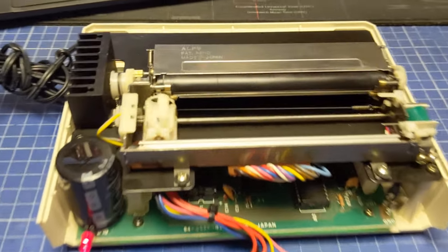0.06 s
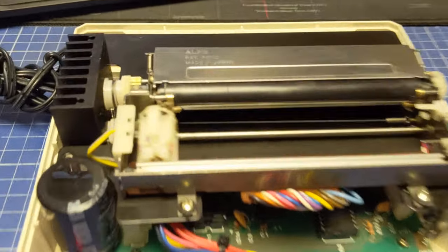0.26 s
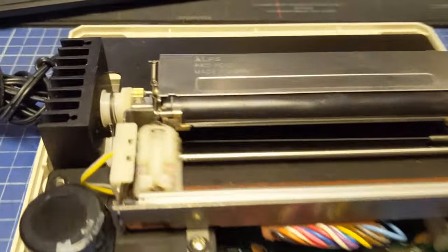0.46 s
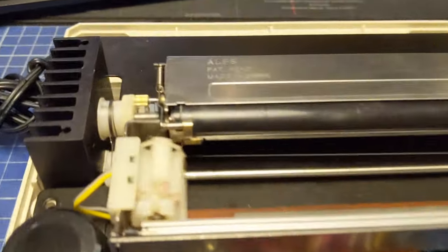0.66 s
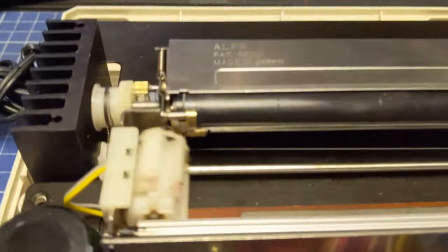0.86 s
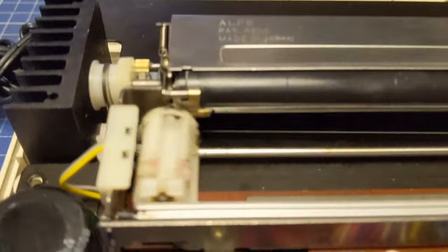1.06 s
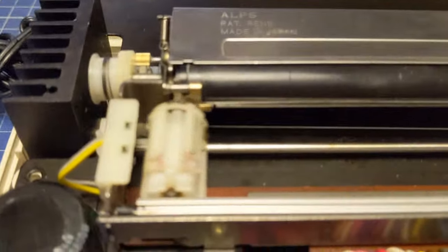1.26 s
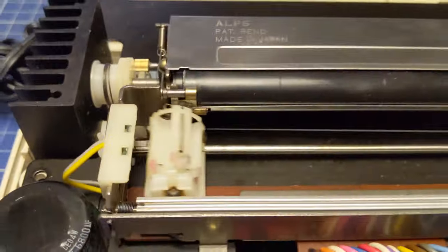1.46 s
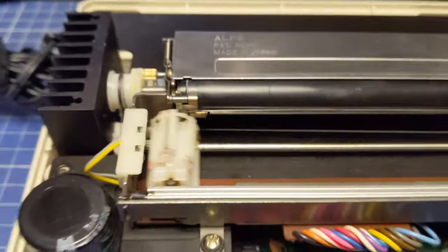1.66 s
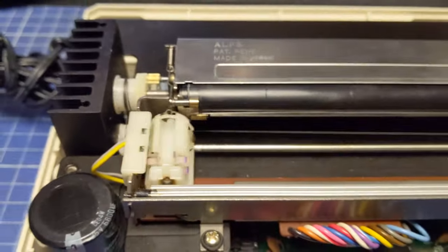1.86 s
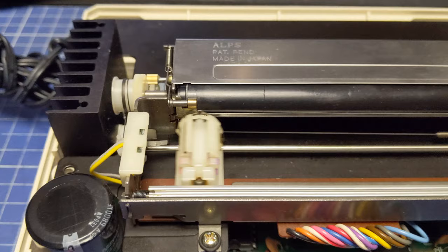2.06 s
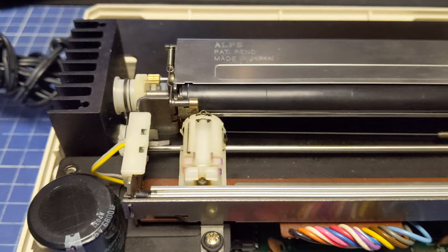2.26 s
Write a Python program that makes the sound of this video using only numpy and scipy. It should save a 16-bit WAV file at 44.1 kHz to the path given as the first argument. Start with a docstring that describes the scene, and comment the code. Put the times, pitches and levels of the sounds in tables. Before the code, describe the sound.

A small pen plotter clicks close by from the start, repeating a pattern of sharp snaps, light metallic knocks and clacks about four times a second. At about 2.1 seconds a last snap leaves a spring ringing thinly. Around 2.25 seconds the motor jolts into a soft whine with a few brief gear rattles. Faint hum and the noise of a small, dry room lie underneath throughout.

```python
"""A small pen plotter indexes its pen drum, close by on a desk, about four times a second.
Each cycle: the pawl snaps in, the carriage knocks, the pawl snaps back, a second knock, the detent clacks.
Every hit is a brief chatter of contacts that rings the resonances of its part. A last snap leaves a
spring ringing, then the stepper motor sets off. Mains hum and a small dry room lie underneath."""
import sys
import numpy as np
from scipy import signal
from scipy.fft import rfft, irfft
from scipy.io import wavfile

SR = 44100
rng = np.random.default_rng(int(sys.argv[2]) if len(sys.argv) > 2 else 0)


def to_wav(sig):
    """Store sig (one row per channel, or 1-D mono) as 16-bit WAV at the path in sys.argv[1].

    Samples outside -1..1 are clipped; the rate is SR.
    """
    pcm = np.clip(np.atleast_2d(sig), -1, 1) * 32767
    pcm = np.round(pcm).astype(np.int16)
    wavfile.write(sys.argv[1], SR, pcm.T)  # frames by channels


N = 105840
LEAD_S = .1  # pre-roll, so a hit can begin before time zero


def undb(db):
    """Decibels to gain."""
    return 10 ** (np.asarray(db) / 20)


def unit(x):
    """Scale to an energy of one."""
    return x / np.sqrt(np.sum(x ** 2) + 1e-30)


def clock(seconds):
    """Sample times in seconds."""
    return np.arange(int(seconds * SR)) / SR


def silence():
    """An empty track with pre-roll."""
    return np.zeros(N + int(LEAD_S * SR))


def add(track, start, sound):
    """Mix a sound into a track with pre-roll."""
    i = int((start + LEAD_S) * SR)
    part = sound[:len(track) - i]
    track[i:i + len(part)] += part


def split(events):
    """Split cues with two levels into two lists of (start, level)."""
    return [(s, db) for s, db, _ in events], [(s, db) for s, _, db in events]


def resonate(x, hz, width):
    """A steep resonance: a band-pass applied twice."""
    b, a = signal.iirpeak(min(hz, .45 * SR), hz / (1.5 * width), fs=SR)
    return signal.lfilter(b, a, signal.lfilter(b, a, x))


def ring(t, hz, t60):
    """One fading mode."""
    return np.sin(2 * np.pi * hz * t) * np.exp(-np.log(1000) * t / t60)


def flutter(t, per_second=70):
    """Quick random wobble."""
    knots = np.arange(0, t[-1], 1 / per_second)
    return np.interp(t, knots, rng.standard_normal(len(knots)))


def background():
    """A bed of soft room noise under the slightly wavering hum of mains and fan."""
    # Room noise spectrum. Each row: frequency in Hz, relative density in dB.
    air_curve = [(30, 0.5), (60, -2.5), (110, -2.5), (200, -1.5), (300, -2.5), (450, -8.5), (650, -12.5),
                 (1400, -14.5), (3000, -11.5), (4500, -15), (9500, -22.5), (15500, -21.5)]
    # Mains and fan tones. Each row: frequency in Hz, level in dB.
    hum_tones = [(50.2, -76), (92, -80), (135.7, -92), (162.5, -66), (249, -79.5)]
    t, f = np.arange(N) / SR, np.fft.rfftfreq(N, 1 / SR)
    air_hz, air_db = np.array(air_curve).T
    colour = undb(np.interp(np.log(f + 1), np.log(air_hz), air_db))
    air = irfft(rfft(rng.standard_normal(N)) * colour, N)
    out = unit(air) * np.sqrt(N) * undb(-64.5)
    for hz, db in hum_tones:
        waver_db = .3 * np.interp(t, np.linspace(0, t[-1], 20), rng.standard_normal(20))
        out += np.sqrt(2) * undb(db + waver_db) * np.sin(2 * np.pi * (hz * t + rng.random()))
    return out


def room():
    """A bright near reflection and a short tail, new for each hit because the listener is moving."""
    # Reverb bands. Each row: centre in Hz, time to fade 60 dB in seconds, level in dB.
    bands = [(463, 0.31, 8), (1390, 0.044, -6.5), (3200, 0.16, -4.5), (6650, 0.21, -4), (8800, 0.19, -10.5),
             (13400, 0.15, -10)]
    t = np.arange(8192) / SR
    wall_delay_s = .0066 + .00015 * rng.standard_normal()
    echo = signal.unit_impulse(len(t), int(wall_delay_s * SR))
    wall = signal.lfilter(*signal.butter(2, 11000, 'high', fs=SR), echo)
    noise, f = rfft(rng.standard_normal(len(t))), np.fft.rfftfreq(len(t), 1 / SR)
    predelay_s, bloom_s = .00043, .011
    onset = np.clip((t - predelay_s) / bloom_s, 0, 1)
    centres, tail = [row[0] for row in bands], 0
    for (_, t60, db), solo in zip(bands, np.eye(len(bands))):
        band = irfft(noise * np.interp(f, centres, solo), len(t))
        tail = tail + undb(db) * band * unit(onset * np.exp(-np.log(1000) * t / t60))
    return undb(-12) * wall + tail


def hits(events, modes, rise_s, decay_s, crack_db, wet_db, lag_s=0, strike=0):
    """Chattering contacts, with an optional clean strike at their crest, ring a part and the room."""
    out, t = silence(), clock(.1)
    push = np.minimum(t / rise_s, 1) * np.exp(-np.maximum(t - rise_s, 0) / decay_s)
    crest = t == t[np.argmax(push)]
    for start, db in events:
        chatter = unit(push * rng.standard_normal(len(t))) + strike * crest
        crack = unit(signal.lfilter(*signal.butter(2, 1500, 'high', fs=SR), chatter))
        body = sum(undb(mode_db) * unit(resonate(chatter, hz, width)) for hz, width, mode_db in modes)
        gain = undb(db) * np.sqrt(.002 * SR)  # the energy of 2 ms at this level
        hit = gain * (undb(crack_db) * crack + body)
        add(out, start + lag_s, hit)
        add(out, start + lag_s, undb(wet_db) * signal.fftconvolve(hit, room()))
    return out


def slide():
    """The carriage rubs softly on its rail, dying away shortly before the last cycles."""
    # Rail resonances. Each row: centre in Hz, width in Hz, relative level in dB.
    rail_modes = [(2770, 2500, 6.5), (5760, 1600, 0), (8900, 1100, 1.5), (12400, 3800, -7)]
    stop_s, release_s = 1.72, .033
    t = np.arange(N) / SR
    rub = sum(undb(db) * unit(resonate(rng.standard_normal(N), hz, width))
              for hz, width, db in rail_modes)
    fade = np.exp(-np.maximum(t - stop_s, 0) / release_s)
    return unit(rub) * np.sqrt(N) * undb(-72.5) * fade


def motor():
    """Uneven steps rattle the gear train, hardest as it jolts into motion; the motor whines."""
    # Motor and gear resonances. Each row: centre in Hz, width in Hz, relative level in dB.
    gear_modes = [(805, 100, -5), (1144, 46, -7.5), (1570, 95, -3), (2150, 530, -5.5), (2800, 780, -0.5),
                  (3370, 210, -10), (5500, 1500, -5), (8950, 1000, -12.5)]
    # Growl and whine. Each row: frequency in Hz, level in dB.
    whine_tones = [(255, -74.5), (511, -74), (1572, -72.5), (2697, -76)]
    # Gear rattles. Each row: start in seconds, level in dB.
    rattles = [(2.291, -60), (2.320, -61), (2.366, -58)]
    start_s, step_hz, step_scatter, step_spread_db = 2.2503, 255.3, .078, 3.7
    jolt_db, jolt_s, flutter_db, flutter_rad = 16, .0086, 4, .8
    out, t = silence(), clock(.94)
    timing, force = rng.standard_normal((300, 2)).T
    at = (np.cumsum(np.abs(1 + step_scatter * timing)) * SR / step_hz).astype(int)
    at -= at[0]
    steps, inside = np.zeros(len(t)), at < len(t)
    steps[at[inside]] = undb(step_spread_db * force[inside])
    drive = unit(steps) + unit(rng.standard_normal(len(t)))
    gears = unit(sum(undb(db) * unit(resonate(drive, hz, width)) for hz, width, db in gear_modes))
    whine = np.zeros(len(t))
    for hz, db in whine_tones:
        level = np.sqrt(2) * undb(db + flutter_db * flutter(t))
        whine += level * np.sin(2 * np.pi * hz * t + flutter_rad * flutter(t))
    jolt = 1 + undb(jolt_db) * np.exp(-t / jolt_s)
    add(out, start_s, whine + gears * np.sqrt(len(t)) * undb(-66.5) * jolt)
    return out + hits(rattles, gear_modes, rise_s=.0013, decay_s=.0063, crack_db=1.5, wet_db=-10)


def spring(start_s=2.105):
    """The last snap leaves a spring ringing thinly."""
    # Spring modes. Each row: frequency in Hz, time to fade 60 dB in seconds, level in dB.
    modes = [(1590, .12, -58), (1760, .26, -66), (5593, .3, -57)]
    out, t = silence(), clock(.5)
    add(out, start_s, sum(undb(db) * ring(t, hz, t60) for hz, t60, db in modes))
    return out


def detent():
    """The detent drops home with a midrange clack, once a cycle."""
    # Clacks. Each row: start in seconds, level in dB.
    clacks = [(.1685, -51.5), (.403, -44), (.6335, -49.5), (.8884, -41.5), (1.1119, -44.5), (1.3433, -41.5),
              (1.5863, -42), (1.8238, -45.5), (2.0552, -46.5)]
    # Detent resonances. Each row: centre in Hz, width in Hz, relative level in dB.
    modes = [(1880, 190, -14.5), (2617, 370, -9.5), (2846, 290, -2.5), (3660, 480, -5), (4420, 550, -5),
             (5600, 660, -2), (7600, 1700, -9), (9800, 3200, -11), (13300, 3600, -19)]
    return hits(clacks, modes, rise_s=.00052, decay_s=.0034, crack_db=-9.5, wet_db=-1,
                strike=undb(-8.5))


def frame(thuds, lag_s):
    """The metal frame rings on with the same notes after every thud."""
    # Frame modes. Each row: frequency in Hz, time to fade 60 dB in seconds, dB relative to the thud.
    modes = [(788, .3, -25), (1110, .1, -20), (1582, .25, -15.5), (1764, .28, -16), (2301, .28, -19),
             (2891, .15, -20), (5793, .2, -23)]
    out, t = silence(), clock(.5)
    for start, thud_db in thuds:
        add(out, start + lag_s, sum(undb(thud_db + db) * ring(t, hz, t60) for hz, t60, db in modes))
    return out


def carriage():
    """A short scrape builds up to a hard tap; just after, the chassis thuds and the frame rings."""
    # Knocks. Each row: start in seconds, tap level in dB, thud level in dB.
    knocks = [(.008, -50.5, -49.5), (.126, -54, -52), (.2435, -50, -51.5), (.3612, -53, -50.5),
              (.4808, -49.5, -49.5), (.597, -51.5, -48.5), (.7150, -48.5, -45), (.8315, -50, -48.5),
              (.9502, -47.5, -47.5), (1.0628, -52, -53), (1.068, -49.5, -48.5), (1.1845, -45.5, -49.5),
              (1.3022, -49.5, -47), (1.4202, -47.5, -44.5), (1.5374, -49.5, -48), (1.6555, -48, -48),
              (1.7726, -50, -47.5), (1.8905, -47.5, -46.5), (2.0078, -49.5, -49)]
    # Resonances of tap, chassis and dull scrape. Each row: centre in Hz, width in Hz, relative dB.
    tap_modes = [(3050, 880, -5), (3555, 91, -11), (5840, 2100, 4), (7590, 610, 0), (10200, 1800, -1.5),
                 (12400, 4300, -4)]
    thud_modes = [(823, 46, -19.5), (1143, 177, -8.5), (1619, 186, -1), (2210, 200, -7.5), (2885, 380, -3)]
    scrape_modes = [(1074, 390, -1), (1630, 460, 3)]
    thud_lag_s, scrape_lead_s = .000767, .007
    taps, thuds = split(knocks)
    dull = dict(decay_s=.0029, crack_db=-50, wet_db=-3.5)
    tap = hits(taps, tap_modes, rise_s=.0004, decay_s=.0059, crack_db=-8, wet_db=-1)
    thud = hits(thuds, thud_modes, rise_s=.0005, lag_s=thud_lag_s, strike=undb(-13.5), **dull)
    scrape = hits(thuds, scrape_modes, rise_s=scrape_lead_s, lag_s=-scrape_lead_s, **dull)
    return tap + thud + undb(-11.5) * scrape + frame(thuds, thud_lag_s)


def pawl_in():
    """The pawl snaps in: its lever clicks and its tip pings, now hard, now soft."""
    # Inward snaps. Each row: start in seconds, tip level in dB, lever level in dB.
    snaps = [(-.012, -37, -48.5), (.2238, -50.5, -49), (.4589, -29.5, -49), (.6932, -44, -47),
             (.9278, -33, -47), (1.1638, -28.5, -44.5), (1.3970, -46, -43.5), (1.6323, -36.5, -46.5),
             (1.8691, -26, -49.5), (2.1030, -43.5, -48.5)]
    # Resonances of tip and lever. Each row: centre in Hz, width in Hz, relative level in dB.
    tip_modes = [(9686, 255, 0), (10250, 140, -19), (12270, 380, -14), (12430, 390, -9),
                 (14200, 1100, -14.5)]
    lever_modes = [(1790, 255, -10), (3200, 880, -5), (5840, 290, -4.5), (8640, 1700, -0.5),
                   (12000, 260, -6), (15060, 590, 1.5)]
    tips, levers = split(snaps)
    ping = hits(tips, tip_modes, rise_s=.00051, decay_s=.00065, crack_db=-39, wet_db=-1.5, strike=1)
    click = hits(levers, lever_modes, rise_s=.00087, decay_s=.0012, crack_db=-39, wet_db=5)
    return ping + click


def pawl_back():
    """The pawl snaps back with a bright click, and its stop pings."""
    # Return snaps. Each row: start in seconds, click level in dB, ping level in dB.
    snaps = [(.0922, -46.5, -54), (.3259, -45, -52), (.5628, -43, -39), (.7980, -44, -52),
             (1.0325, -44, -48), (1.2658, -40, -37.5), (1.5036, -39.5, -61), (1.7384, -41.5, -59),
             (1.9720, -41.5, -35)]
    # Resonances of pawl and stop. Each row: centre in Hz, width in Hz, relative level in dB.
    pawl_modes = [(3200, 1400, -14.5), (5690, 440, -9), (7700, 470, -6.5), (8720, 530, 0),
                  (9350, 400, -1.5), (12200, 500, -8.5), (15000, 2200, -0.5)]
    stop_modes = [(9200, 320, -12.5), (12160, 490, -0.5), (12800, 570, -7), (15040, 370, -0.5)]
    clicks, pings = split(snaps)
    contact = dict(rise_s=.0004, decay_s=.0015, crack_db=-26, wet_db=4, strike=undb(2))
    return hits(clicks, pawl_modes, **contact) + hits(pings, stop_modes, **contact)


def scene():
    """The moving parts, trimmed of their pre-roll, over the room bed, in mono."""
    mechanism = detent() + pawl_in() + pawl_back() + carriage() + spring() + motor()
    return (mechanism[-N:] + slide() + background())[None]


def record(dry):
    """A steep low-pass cuts the top above 16 kHz."""
    return signal.sosfilt(signal.ellip(8, .2, 70, 16000, fs=SR, output="sos"), dry)


dry = scene()
out = record(dry)
to_wav(out)
```